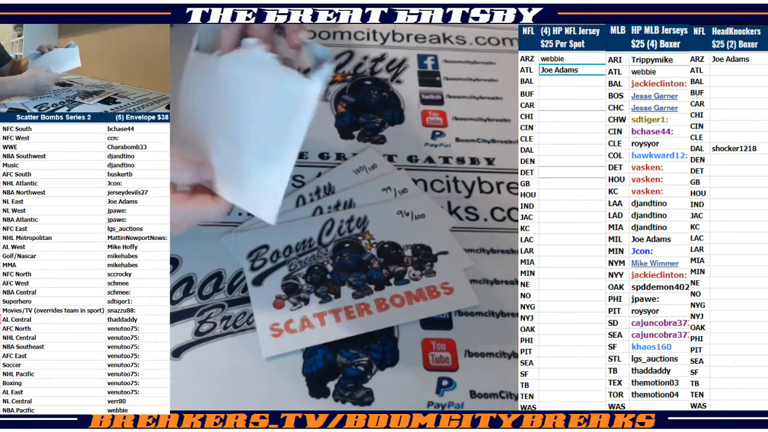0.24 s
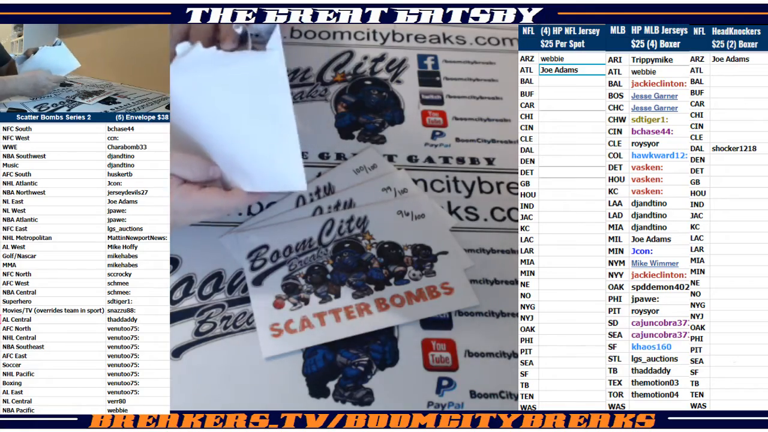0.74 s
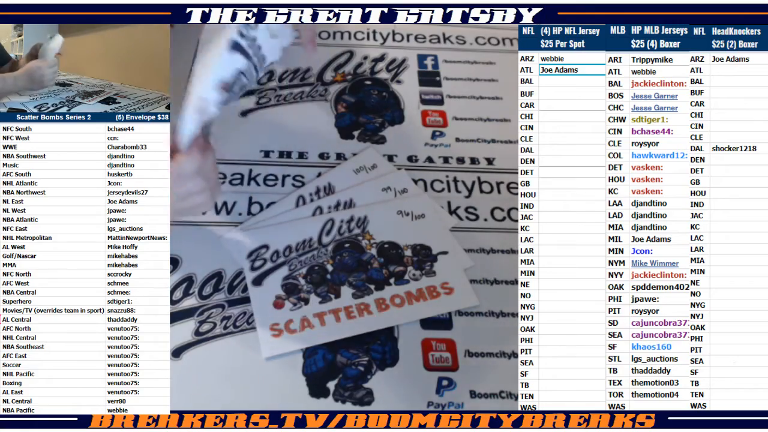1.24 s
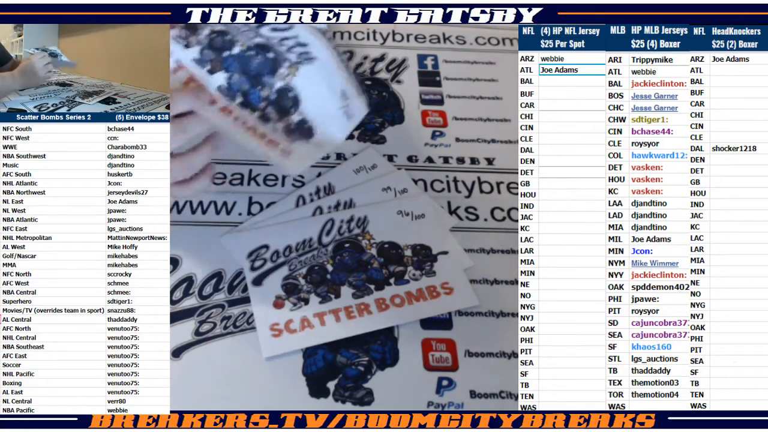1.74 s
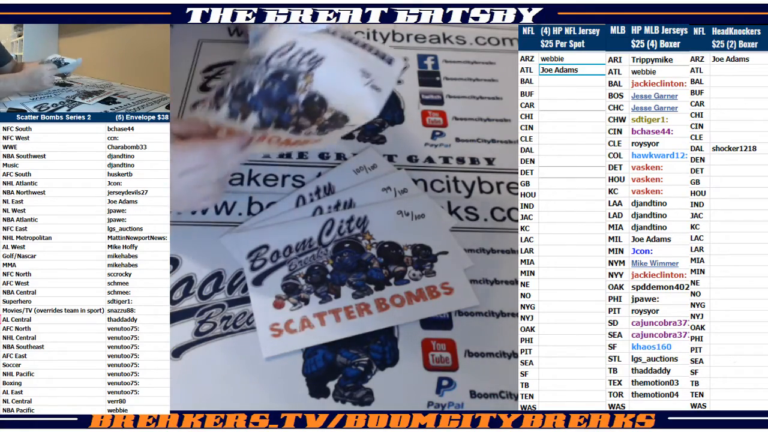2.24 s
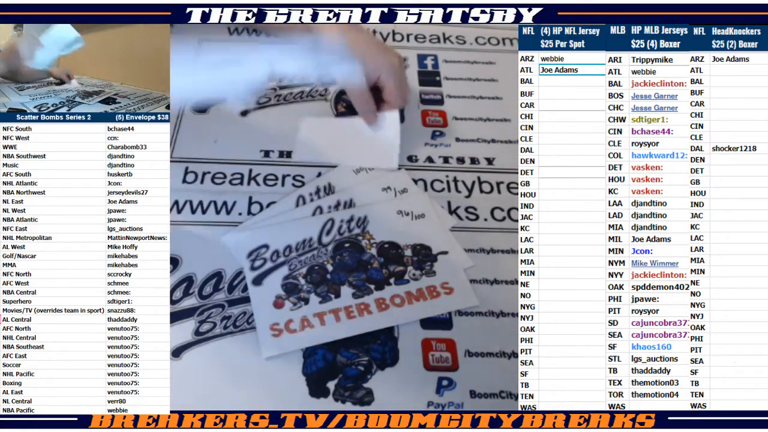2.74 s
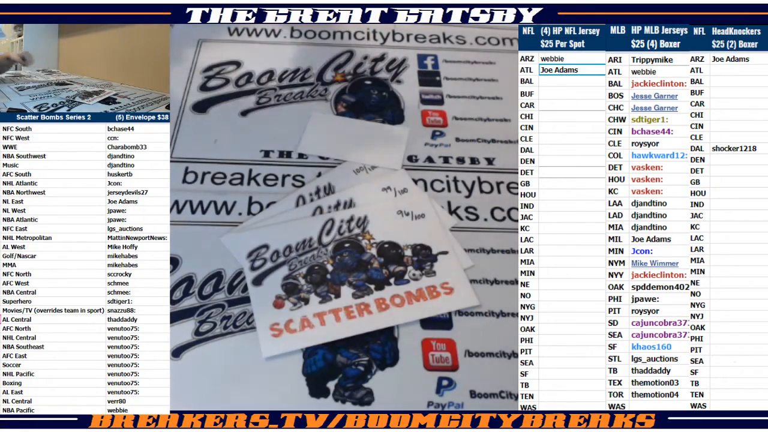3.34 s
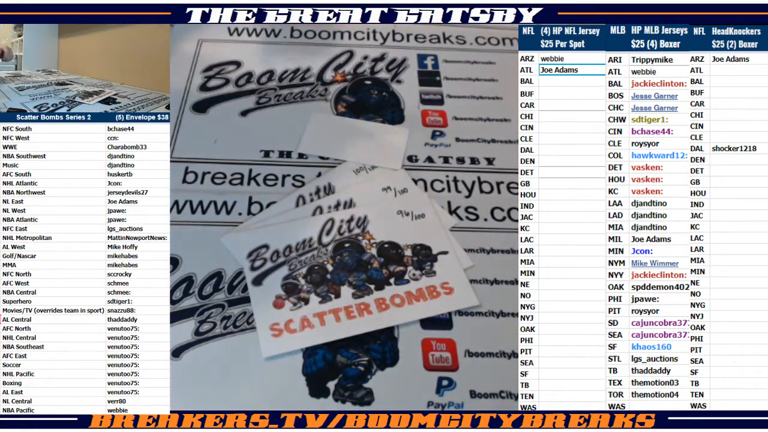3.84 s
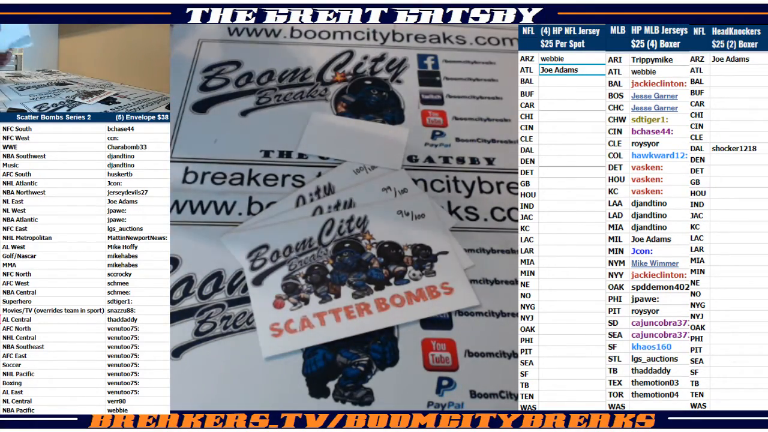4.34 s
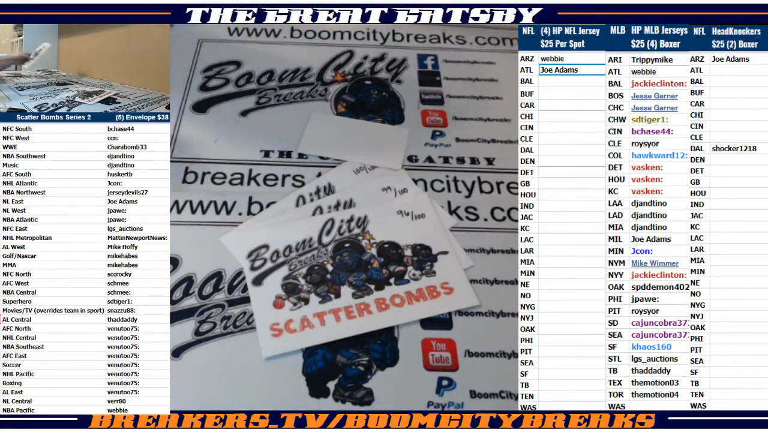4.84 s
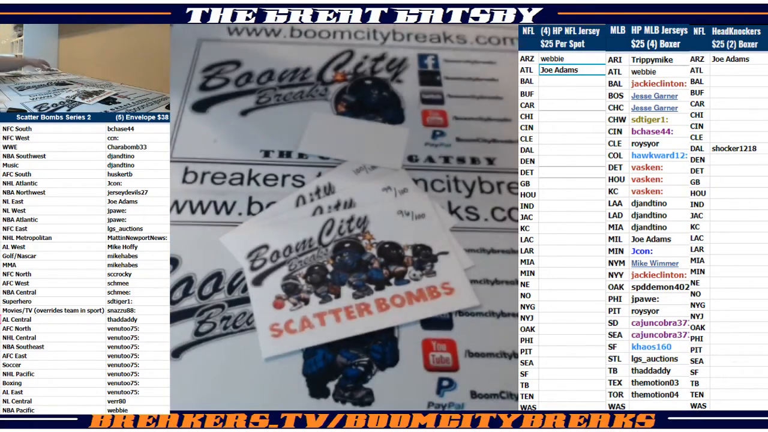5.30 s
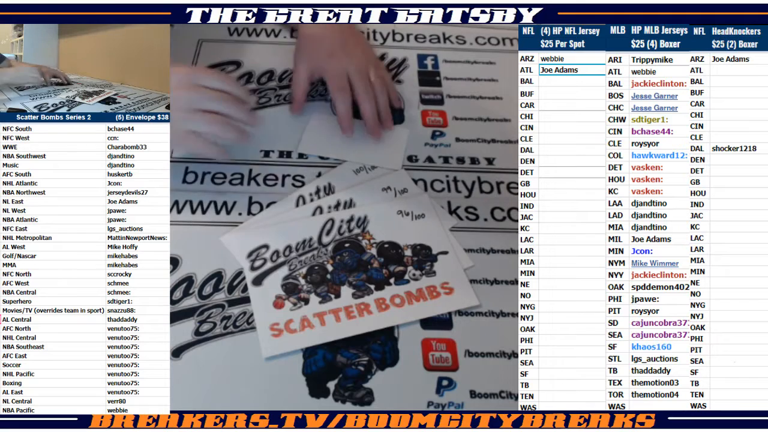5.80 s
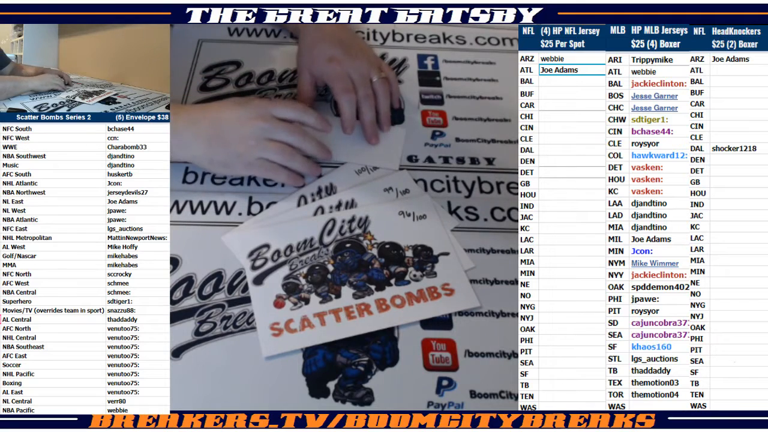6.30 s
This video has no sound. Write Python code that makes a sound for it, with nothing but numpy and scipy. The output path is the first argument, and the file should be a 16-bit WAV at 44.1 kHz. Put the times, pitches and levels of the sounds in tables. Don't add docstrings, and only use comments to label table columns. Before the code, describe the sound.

Close, crisp ripping and snapping of stiff paper, a quiet gap with a short scraping rub, more crackling, then near silence with soft sliding.

```python
import sys
import numpy as np
from scipy import signal
from scipy.fft import rfft, irfft
from scipy.io import wavfile
from scipy.ndimage import uniform_filter1d

SR = 44100
rng = np.random.default_rng(int(sys.argv[2]) if len(sys.argv) > 2 else 0)


def to_wav(sig):
    pcm = np.clip(np.atleast_2d(sig), -1, 1) * 32767
    pcm = np.round(pcm).astype(np.int16)
    wavfile.write(sys.argv[1], SR, pcm.T)


def boost_factor(decibels):
    exponent = np.asarray(decibels, float) / 20
    return 10 ** exponent


N = 289296
EFFORT_DB = -50

# (frequency [Hz], level [dB per Hz])
PAPER = [(88, -44), (150, -15), (391, -14), (702, -21.5), (1100, 5.5), (1310, -0.5), (1420, 4), (1870, -3),
         (2100, 1), (2310, -1.5), (2920, -0.5), (3420, -5), (7040, -5), (12200, -39), (16000, -42.5)]


def rms_one(x):
    return x / np.sqrt(np.mean(x ** 2) + 1e-20)


def gains_in_time(rows):
    time_s, *columns_db = np.transpose(rows)
    t = np.arange(N) / SR
    return np.array([boost_factor(np.interp(t, time_s, db, left=-200, right=-200)) for db in columns_db])


def at_hz(points, hz):
    points = np.array(points)
    return np.interp(np.log(hz), np.log(points[:, 0]), points[:, 1])


def drift(rate_hz):
    r = np.exp(-40 * 2 * np.pi * rate_hz / SR)
    slow = signal.lfilter([1], [1, -2 * r, r * r], rng.standard_normal(N // 40 + 2002))[2000:]
    return np.interp(np.arange(N) / 40, np.arange(len(slow)), rms_one(slow))


def resonate(x, hz, width_hz):
    r = np.exp(-np.pi * width_hz / SR)
    zeros = np.array([1, 0, -1]) * (1 - r * r) / 2
    poles = [1, -2 * r * np.cos(2 * np.pi * hz / SR), r * r]
    return signal.lfilter(zeros, poles, x + 1e-18)


def coloured(x, spectrum):
    hz = np.maximum(np.fft.rfftfreq(len(x), 1 / SR), 1)
    return rms_one(irfft(rfft(x) * boost_factor(at_hz(spectrum, hz)), len(x)))


def background():
    # (frequency [Hz], level [dB per Hz])
    air = [(15, -51), (25, -24.5), (123, -5.5), (153, -25), (195, -2.5), (263, -17.5), (344, -19),
           (405, -20), (516, -14), (1520, -15.5), (2160, -20.5), (2410, -23), (3820, -26.5), (4140, -28.5),
           (16000, -38.5)]
    # (frequency [Hz], width [Hz], level [dB])
    hum = [(205, 18, -76), (325, 26, -73), (450, 60, -75), (700, 300, -79)]
    air_db, mains_db, mains_hz = -73 + 2.5, -76.5, 120
    fan = sum(boost_factor(db) * rms_one(resonate(rng.standard_normal(N), hz, width_hz)) for hz, width_hz, db in hum)
    mains = boost_factor(mains_db + 3.1 * drift(3)) * np.sin(2 * np.pi * mains_hz * np.arange(N) / SR)
    return boost_factor(air_db) * coloured(rng.standard_normal(N), air) + fan + mains


def bumps():
    # (time [s], peak [dB], frequency [Hz])
    contacts = [(0.49, -61, 107), (0.929, -67, 92.8), (1.2, -56, 95), (1.369, -59, 75), (1.588, -61.5, 105),
                (1.815, -63, 125), (2.24, -63, 106), (2.31, -59, 103), (2.612, -65, 60), (2.69, -60, 80),
                (5.82, -68, 77), (6.459, -69, 88), (4.5, -70, 60), (1.66, -70, 45), (4.56, -68, 130)]
    t60_s, rise_s = 0.18, 0.006
    out, t = np.zeros(N), np.arange(SR // 4) / SR
    for time_s, peak_db, hz in contacts:
        swing = np.sin(2 * np.pi * hz * t) * boost_factor(-60 * t / t60_s) * (1 - np.exp(-t / rise_s))
        at = round(time_s * SR)
        out[at:at + len(t)] += boost_factor(peak_db + 9.5) * swing[:N - at]
    return out


def rub(stroke, modes, dulls=0):
    friction = rng.standard_normal(N) * boost_factor(1.3 * drift(80))
    slow = rms_one(uniform_filter1d(uniform_filter1d(friction, size=1500), size=1500))
    speed = gains_in_time(stroke)[0]
    relative_speed = np.minimum(2 * speed / speed.max(), 1)
    steady, faded = 0, 0
    for k, (hz, width_hz, db) in enumerate(modes):
        wander = np.roll(slow, k * N // 15)
        ring = (-1) ** k * boost_factor(db + 2.5 * wander) * resonate(friction, hz, width_hz)
        steady = steady + ring
        faded = faded + ring * relative_speed ** (dulls * abs(np.log2(hz / 2500)))
    return speed * faded / np.std(steady)


def mouse_nudge():
    # (time [s], level [dB])
    stroke = [
        (3.22, -88),
        (3.26, -71),
        (3.42, -71),
        (3.5, -84),
    ]
    # (frequency [Hz], width [Hz], level [dB])
    modes = [(2120, 130, 0), (3650, 250, -5), (4400, 200, -12)]
    return rub(stroke, modes)


def hand_slide():
    # (time [s], level [dB])
    stroke = [(5.8, -75), (5.88, -70), (6.11, -70.5), (6.346, -80.5), (6.44, -76)]
    # (frequency [Hz], width [Hz], level [dB])
    modes = [(1270, 200, 9), (3780, 160, 4)]
    return rub(stroke, modes)


def fingertip_glide():
    # (time [s], level [dB])
    stroke = [(6.14, -72), (6.162, -75), (6.38, -71), (6.44, -94)]
    # (frequency [Hz], width [Hz], level [dB])
    modes = [(6500, 1500, 3), (8600, 700, 5), (11500, 2000, -3)]
    return rub(stroke, modes)


def mouse_rub():
    # (time [s], level [dB])
    forth = [(3.79, -71), (3.82, -59), (3.88, -52.5), (3.925, -57.5), (3.99, -51), (4.02, -53),
             (4.045, -62), (4.105, -72)]
    # (time [s], level [dB])
    back = [(4.105, -70), (4.13, -56), (4.16, -52), (4.2, -57), (4.23, -54), (4.247, -49.5), (4.28, -56),
            (4.34, -66)]
    # (frequency [Hz], width [Hz], level [dB])
    modes = [(420, 300, -9), (950, 610, -9), (1630, 80, -4), (2060, 40, 1.5), (2320, 61, 1), (2520, 52, 3),
             (3190, 460, -7.5), (5190, 320, -5), (5900, 450, -10.5), (6720, 370, -5.5), (8240, 850, -13.5),
             (10600, 1500, -15), (11750, 600, -13.5), (13200, 700, -26)]
    return rub(forth + back[1:], modes, dulls=.4)


def bursts(events, rise_s, crack, hold_share, width_share, low_hz, high_hz):
    out, t = np.zeros(N), np.arange(SR // 5) / SR
    steep = signal.butter(3, [low_hz, high_hz], "band", fs=SR, output="sos")
    seeds = rng.integers(0, 2 ** 31, len(events))
    for (time_s, peak_db, hz, t60_s, others_db), seed in zip(events, seeds):
        own = np.random.default_rng(seed)
        late = np.maximum(t - hold_share * t60_s, 0)
        fade = boost_factor(-60 * late / np.clip(t60_s, .01, .4)) * np.minimum(t / rise_s, 1)
        run = own.standard_normal(len(t)) * boost_factor(5.25 * own.standard_normal(len(t))) * fade
        run[0] = crack
        others_hz = np.geomspace(low_hz, high_hz, 7)[1:-1] * own.uniform(.87, 1.15, 5)
        ringing = resonate(run, hz, hz * width_share)
        for f in others_hz:
            far = min(f / hz, hz / f) ** .3
            tilt_db = min(at_hz(PAPER, f) - at_hz(PAPER, hz), 3.0)
            ringing += far * boost_factor(others_db + tilt_db) * resonate(run, f, f * width_share)
        ringing = signal.sosfilt(steep, ringing)
        at = round(time_s * SR)
        out[at:at + len(t)] += (boost_factor(peak_db) * ringing / np.abs(ringing).max())[:N - at]
    return out


def knocks():
    # (time [s], peak [dB], pitch [Hz])
    handled = [(0.177, -43, 215), (0.26, -47, 800), (0.0, -49, 320), (0.363, -45, 246), (0.498, -27, 693),
               (0.508, -38, 300), (0.927, -32, 255), (1.205, -44.5, 190), (1.347, -37.5, 318),
               (1.59, -42, 207), (1.644, -40, 217), (1.385, -41, 200), (1.822, -41.5, 282),
               (1.848, -43, 308), (1.937, -41.5, 770), (2.238, -36, 380), (2.292, -40.5, 475),
               (2.349, -40, 646), (2.46, -43, 520), (2.596, -43.5, 549), (2.655, -41, 546),
               (3.04, -49, 820), (2.97, -43.5, 480), (3.068, -42, 455), (3.582, -41.5, 760),
               (4.5, -42, 480), (4.558, -36.5, 383), (5.078, -41, 388), (5.157, -42.5, 370),
               (5.261, -38, 330)]
    # (time [s], peak [dB], pitch [Hz])
    further = [(3.682, -50, 650), (3.668, -52, 800), (2.66, -38, 800), (4.59, -42, 600), (3.076, -44, 700),
               (0.51, -36, 480), (2.245, -38, 200), (5.095, -44, 650), (2.63, -46, 750), (2.72, -48, 700),
               (2.99, -48, 600), (3.13, -50, 600), (0.3, -47, 300)]
    t60_s, ref_hz, damping = .095, 400, .9
    events = [(s, db, hz, t60_s * (ref_hz / max(hz, 300)) ** damping, -16.0) for s, db, hz in handled + further]
    return bursts(events, 0.0027, 0, 0.12, 0.24, low_hz=118.5, high_hz=829)


def ticks():
    # (time [s], peak [dB], pitch [Hz])
    tearing = [(0.3586, -38, 6590), (0.365, -25.5, 7450), (0.5065, -34, 4200), (0.7724, -37.5, 5900),
               (0.9123, -34, 5810), (0.9455, -20.5, 6560), (1.2496, -45, 4200), (1.282, -37, 6480),
               (1.314, -34.5, 5080), (1.6397, -28, 6700), (1.718, -45, 7040), (1.734, -32.5, 4660),
               (1.8008, -23, 7640), (1.849, -44, 4380), (1.934, -28.5, 4260), (2.2363, -35, 4430),
               (2.292, -31, 5430), (2.3213, -27, 5120), (2.3437, -33, 4840), (2.3775, -20, 4950),
               (2.4106, -23.5, 5750), (2.473, -28, 5970)]
    # (time [s], peak [dB], pitch [Hz])
    handling = [(2.605, -41, 5300), (2.753, -32, 5850), (2.9267, -36, 6560), (3.069, -45, 6180),
                (3.1208, -45, 6160), (3.1472, -45.5, 9140), (3.5473, -54, 5600), (3.5578, -53, 4300),
                (3.64, -47.5, 6170), (3.6694, -51, 7270), (4.3475, -47, 4760), (4.3695, -45, 5210),
                (4.3918, -35, 5000), (4.4089, -30, 5030), (4.455, -21.5, 5980), (4.5017, -29, 7120),
                (4.5212, -27.5, 6000), (4.832, -38.5, 6700), (4.9402, -37.5, 5900), (5.0194, -40.5, 5600),
                (5.08, -38, 6100), (5.1272, -38, 7080), (5.1527, -23, 6440), (6.4582, -52.5, 5960)]
    # (time [s], peak [dB], pitch [Hz])
    further = [(5.374, -47, 7900), (2.946, -42, 11500), (2.918, -50, 6500), (3.547, -56, 9600),
               (3.636, -52, 9600), (3.647, -52, 5600), (1.436, -38, 8000), (5.165, -26, 6300),
               (0.147, -40, 6000), (4.952, -46, 10000), (5.024, -46, 11000), (0.574, -42, 5000)]
    t60_s, longer_s_per_db = .045, .0005
    events = [(s, db, hz, t60_s - longer_s_per_db * (db + 35), -5.0)
              for s, db, hz in tearing + handling + further]
    return bursts(events, 0.0008, 4.1, 0.056, 0.075, low_hz=4030, high_hz=15200)


def snaps():
    # (time [s], peak [dB], pitch [Hz], other modes [dB])
    tearing = [(0.1795, -35, 2600, -1), (0.2264, -28, 1950, -11), (0.2962, -43, 1910, -7),
               (0.3564, -32, 1820, 8), (0.3635, -26.5, 3040, -1), (0.4975, -20.5, 1056, -17),
               (0.5075, -12, 1317, -6), (0.826, -32, 1146, -30), (0.8624, -33.5, 1350, 4),
               (0.9114, -34.5, 2830, -7), (0.9308, -23, 1140, -6.5), (0.9976, -35.5, 1310, -1),
               (1.2491, -32.5, 1830, 3), (1.2835, -33, 2850, -8), (1.3458, -30.5, 1190, -12),
               (1.4026, -32, 1580, -18), (1.4398, -34, 3040, -5), (1.6013, -35, 1650, -14),
               (1.6462, -21.5, 1390, -14.5), (1.7374, -28.5, 1060, -3), (1.7448, -25.5, 1650, -16),
               (1.8013, -25, 1480, -1), (1.8472, -20.5, 1520, -5), (1.9355, -17.5, 1940, 12),
               (2.2383, -14.5, 1650, 7), (2.2917, -23.5, 1460, 9), (2.3464, -30.5, 1100, -9),
               (2.3764, -29, 2400, -5), (2.4109, -28, 1087, -8), (2.4694, -30.5, 1300, 10)]
    # (time [s], peak [dB], pitch [Hz], other modes [dB], t60 [s])
    handling = [(2.5965, -40, 1060, -5, .066), (2.6554, -28, 1057, -10, .045),
                (2.6794, -37, 1000, -11, .063), (2.7352, -44, 3020, -14, .06), (2.7536, -28, 3010, -5, .03),
                (2.9267, -39.5, 2320, -11, .065), (2.9594, -40.5, 950, -16, .066),
                (3.0674, -33.5, 1500, -7, .05), (3.1194, -42.5, 964, -5, .068),
                (3.5808, -52, 950, -13, .05), (3.6661, -48, 950, -4, .074), (4.2413, -43, 2340, -4, .069),
                (4.3715, -40.5, 1120, -1, .066), (4.4069, -32, 1970, -2, .056),
                (4.4563, -27.5, 1340, -8, .04), (4.5037, -32, 2080, -14, .04),
                (4.5216, -20.5, 1950, -5, .04), (4.5695, -32.5, 1014, -15, .07),
                (4.8324, -48, 1320, 6, .05), (4.9417, -38.5, 2450, -7, .09), (5.0888, -31, 1160, -11, .055),
                (5.0948, -30.5, 1176, -27, .08), (5.1532, -13.5, 2320, -9, .045),
                (5.1686, -18, 2320, -3, .044), (5.2694, -34.5, 2220, -9, .06),
                (5.2994, -40.5, 2220, -1.5, .066), (5.925, -55, 1470, -7, .08),
                (6.1345, -55, 2570, -16, .08), (6.4597, -54, 1220, -23, .08), (2.657, -33, 3300, -20, .035),
                (4.812, -48, 2000, -8, .06), (3.149, -48, 2300, -10, .04), (3.675, -50, 1950, -12, .05),
                (3.548, -56, 2400, -20, .06), (5.254, -40, 1500, -8, .06)]
    t60_s, longer_s_per_db = .056, .001
    events = [(s, db, hz, t60_s - longer_s_per_db * (db + 30), others_db) for s, db, hz, others_db in tearing]
    events += [(s, db, hz, own_t60_s, others_db) for s, db, hz, others_db, own_t60_s in handling]
    return bursts(events, 0.00046, 14.6, 0.17, 0.09, low_hz=895, high_hz=4490)


def crackle(low_hz, high_hz, per_s, spread_db, cycles, hiss, count):
    sizes = boost_factor(spread_db * np.minimum(rng.exponential(1, N), 5)) * rng.choice([-1, 1], N)
    breaks = rms_one(sizes * (rng.random(N) < per_s * boost_factor(5.0 * drift(25)) / SR))
    drive = breaks + hiss * rng.standard_normal(N)
    dealt = rng.integers(0, count, N)
    out = 0
    for k, hz in enumerate(np.geomspace(low_hz * 1.045, high_hz * 0.98, count)):
        patch = boost_factor(at_hz(PAPER, hz) + 2.0 * drift(14))
        out = out + patch * resonate(drive * (dealt == k), hz, hz / cycles)
    steep = signal.butter(2, [low_hz * .95, high_hz * 1.05], "band", fs=SR, output="sos")
    return rms_one(signal.sosfilt(steep, out))


def size_class(level_db, follows, tearing_share, grain_db):
    # (time [s], effort [dB], tearing over bending [dB])
    pulls = [
        [(0.0, -53, 4), (0.12, -52, 1), (0.165, -46, 1), (0.205, -52, 1), (0.34, -53, 1), (0.364, -51, 10),
         (0.418, -63, 8), (0.5, -58, 3)],
        [(0.5, -47, 5), (0.545, -49, 2), (0.582, -47, 2), (0.6, -54, 1), (0.704, -62, 2)],
        [(0.704, -63, 1), (0.8, -50.5, 2), (0.89, -48, 2), (0.954, -45.5, 3), (0.98, -56, 5), (1.1, -55, 3),
         (1.22, -55, 0)],
        [(1.22, -61, 2), (1.28, -43, -4), (1.41, -45, -4), (1.458, -46, 0), (1.478, -56.5, 2), (1.55, -52, 2),
         (1.636, -48.5, 2), (1.67, -50, 0), (1.72, -51, -1)],
        [(1.72, -47, -4), (1.76, -42, -3), (1.794, -44, -3), (1.818, -38, -3), (1.918, -48.5, -6),
         (1.932, -44.5, 1), (2.052, -50.5, -2), (2.1, -51, -3)],
        [(2.1, -51, -3), (2.2, -45, 0), (2.27, -44, 0), (2.348, -40, 2), (2.4, -45, 3), (2.43, -45, 4),
         (2.464, -50, 6), (2.5, -51, 3), (2.56, -56, -2)],
    ]
    # (time [s], effort [dB], tearing over bending [dB])
    moves = [
        [(2.56, -58, -2), (2.63, -56, -6), (2.706, -60, -2), (2.745, -54, 2), (2.78, -55, 4), (2.848, -66, 3),
         (2.868, -72, -6), (2.905, -80, -4)],
        [(2.905, -80, 0), (2.918, -70, 8), (2.932, -53, 8), (3.014, -64, 2), (3.05, -68, -12), (3.075, -60, -6),
         (3.106, -64, -8), (3.13, -61, 2), (3.2, -80, 3)],
        [(3.2, -78, 3), (3.53, -79, 0), (3.548, -76, 1), (3.59, -74, 0), (3.63, -78, -4), (3.638, -69, 6),
         (3.685, -67, 1), (3.698, -73, -4), (3.8, -78, 1)],
        [(4.33, -83, 4), (4.35, -57, 5), (4.44, -50, 3), (4.518, -43.5, 1), (4.6, -52, -1), (4.63, -59, 1),
         (4.68, -59, 4), (4.76, -69, 3)],
        [(4.76, -70, 4), (4.848, -63.5, 1), (4.935, -62, 2), (4.945, -56, 2), (4.99, -60, 1), (5.03, -54, 1),
         (5.07, -61, 2), (5.085, -53, 0), (5.15, -54, -1)],
        [(5.15, -48, 10), (5.162, -39, 6), (5.24, -51, 2), (5.29, -48, 0), (5.335, -56, 1), (5.36, -63, -4),
         (5.4, -68, -4), (5.42, -76, -12), (5.46, -82, -15)],
        [(5.7, -85, -9), (5.82, -80.5, 0), (5.834, -78, 10), (5.96, -73, -7), (6.088, -71, 8), (6.178, -76, -7),
         (6.56, -80, 5)],
    ]
    total = 0
    for spell, extra_db in zip(pulls + moves, grain_db):
        curve = [(s, level_db + extra_db + follows * (effort_db - EFFORT_DB) + tearing_share * tearing_db)
                 for s, effort_db, tearing_db in spell]
        total = total + gains_in_time(curve)[0]
    return total


def rustle():
    band_edges_hz = [900, 3300, 8000, 15500]
    # (finest hiss [dB], flapping [dB], topmost sheen [dB])
    grain = [(0, 1, 0), (-6, 1, 0), (-0.5, -2, 0), (2.5, 4, 0), (0, 3, 0), (1, 6, 1), (0, 11, 0),
             (0, 11, 0), (2, 10, -3), (2, 6, -2), (3, 3, -3), (-3, 0, 0), (2, 9, -4)]
    low, mid, high, top = band_edges_hz
    fine_db, flap_db, sheen_db = np.transpose(grain)
    even_db = 0 * fine_db
    finest_class = (-57, 1.1, .9)

    flapping = crackle(135, low * 0.85, 400, spread_db=3.5, cycles=4.9, hiss=3.3, count=7)
    creasing = crackle(low, mid, 1500, spread_db=3.6, cycles=26.0, hiss=1.25, count=12)
    ripping = crackle(mid, high, 3000, spread_db=3.0, cycles=10.0, hiss=1.0, count=9)
    finest = crackle(high, top, 4000, spread_db=-2.0, cycles=3.4, hiss=1.5, count=7)
    muffled = signal.sosfilt(signal.butter(2, 11000, fs=SR, output="sos"), finest)
    sheen = finest - muffled

    out = size_class(-67, 1.05, -.2, flap_db) * flapping
    out += size_class(EFFORT_DB, 1, 0, even_db) * creasing
    out += size_class(EFFORT_DB, 1, 1, even_db) * ripping
    out += size_class(*finest_class, fine_db) * muffled
    return out + size_class(*finest_class, fine_db + sheen_db) * sheen


def room(x):
    t60_s, treble_t60_s, level_db, wall_cut_hz = 0.35, 0.2, -15, 2300
    t = np.arange(SR // 2) / SR
    echoes = rng.standard_normal(len(t)) * boost_factor(-60 * t / t60_s) * np.clip(t / 0.0057, 0, 1)
    dull = signal.lfilter(*signal.butter(1, wall_cut_hz, fs=SR), echoes)
    echoes = dull + (echoes - dull) * boost_factor(-60 * t / treble_t60_s)
    return boost_factor(level_db) * signal.fftconvolve(x, echoes / np.linalg.norm(echoes))[:N]


def scene():
    far = background() + bumps() + mouse_nudge()
    near = hand_slide() + fingertip_glide() + mouse_rub()
    near += knocks() + ticks() + snaps() + rustle()
    return (near + room(near) + far)[None]


def top_cut(x):
    return signal.sosfilt(signal.butter(12, 16450, fs=SR, output="sos"), x)


def record(dry):
    cutoff_hz = 16050
    mix = signal.sosfilt(signal.cheby2(20, 60, cutoff_hz, fs=SR, output="sos"), dry)
    return top_cut(mix)


dry = scene()
out = record(dry)
to_wav(out)
```